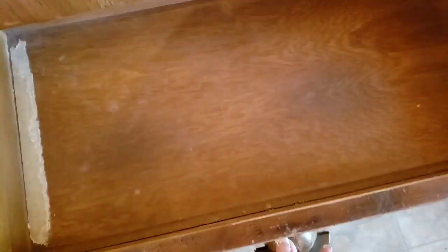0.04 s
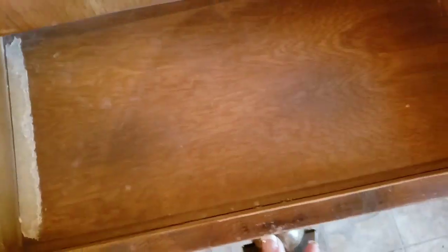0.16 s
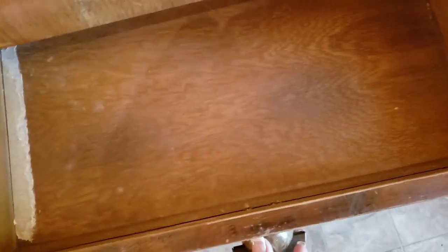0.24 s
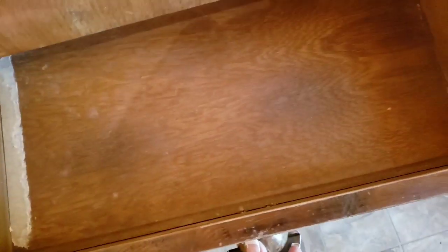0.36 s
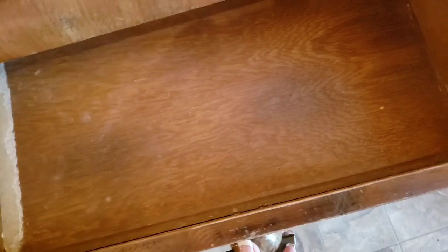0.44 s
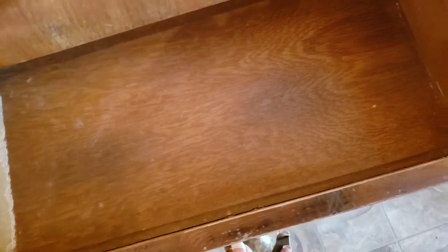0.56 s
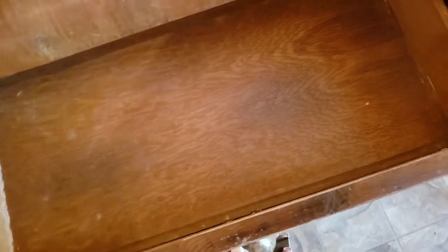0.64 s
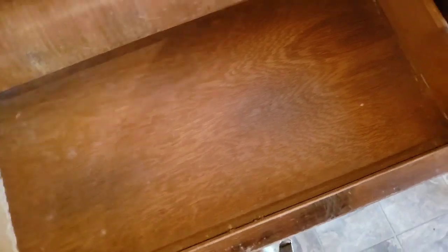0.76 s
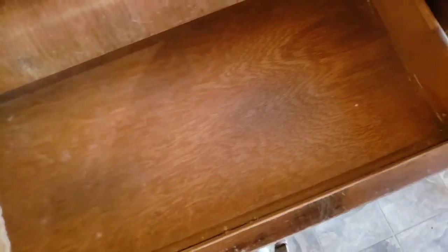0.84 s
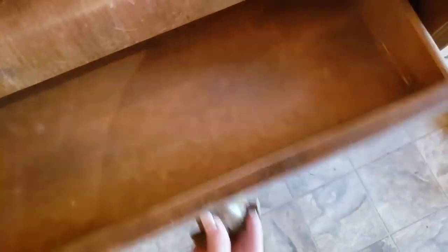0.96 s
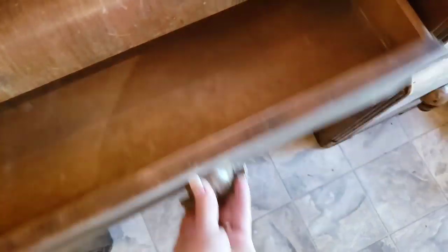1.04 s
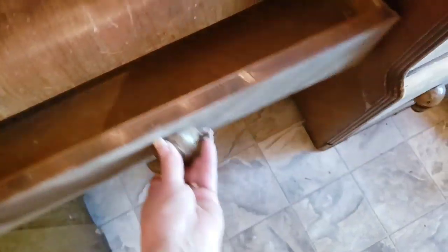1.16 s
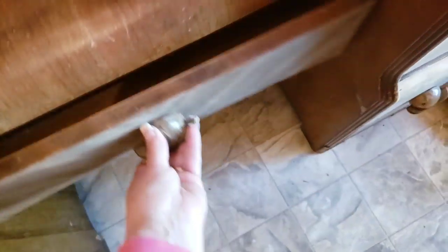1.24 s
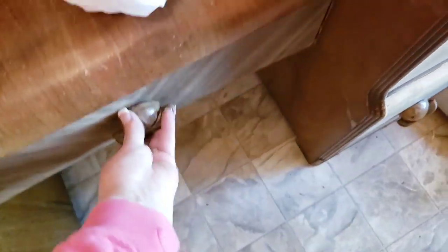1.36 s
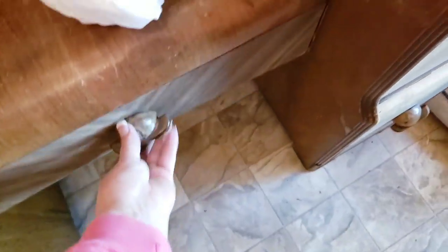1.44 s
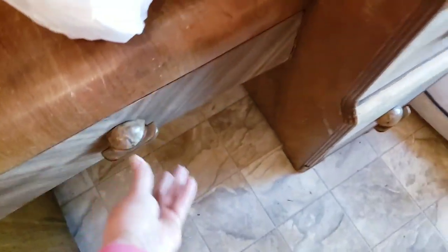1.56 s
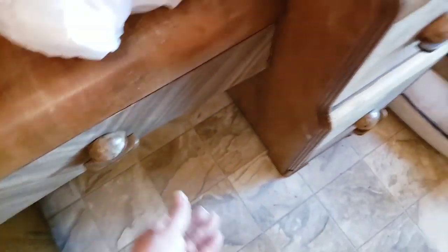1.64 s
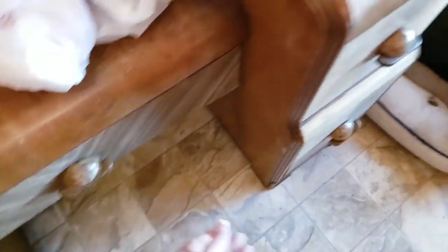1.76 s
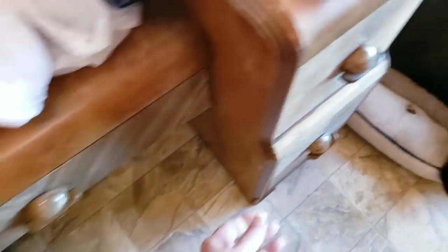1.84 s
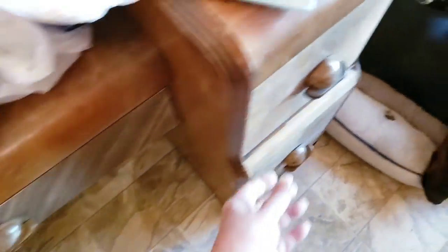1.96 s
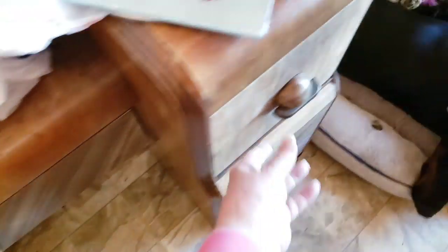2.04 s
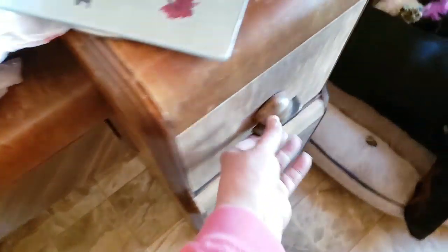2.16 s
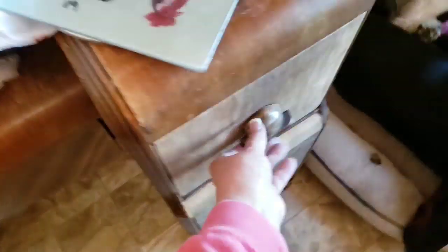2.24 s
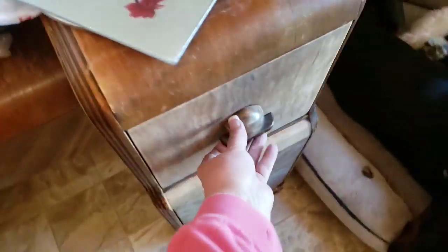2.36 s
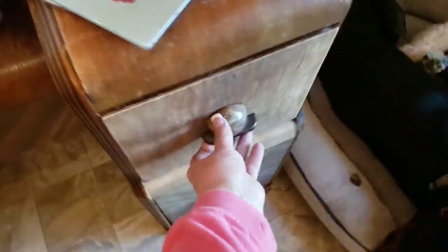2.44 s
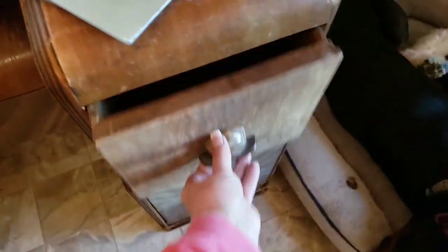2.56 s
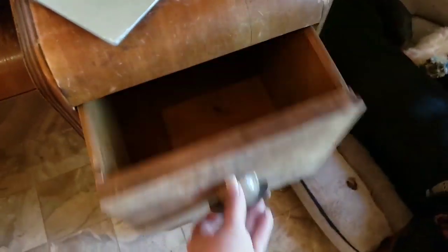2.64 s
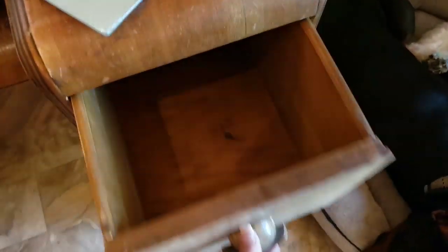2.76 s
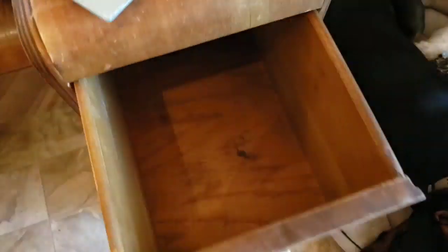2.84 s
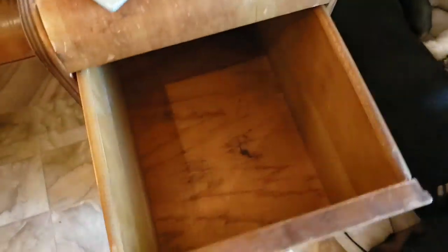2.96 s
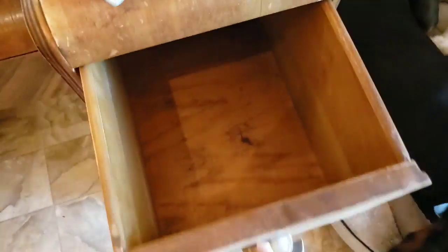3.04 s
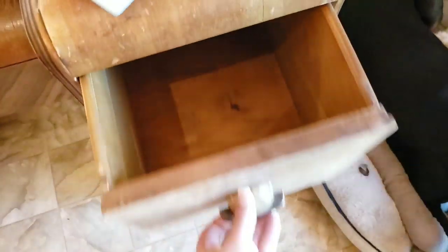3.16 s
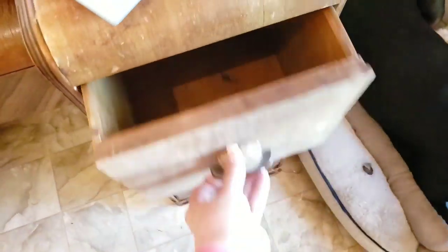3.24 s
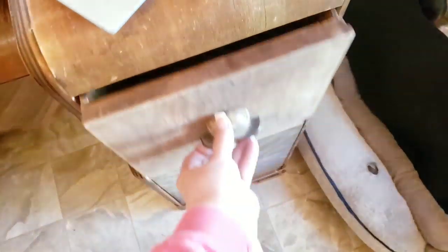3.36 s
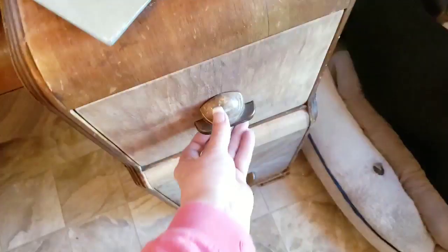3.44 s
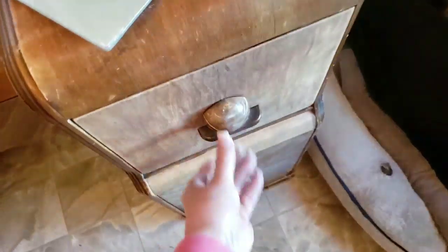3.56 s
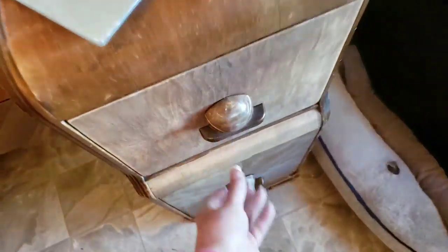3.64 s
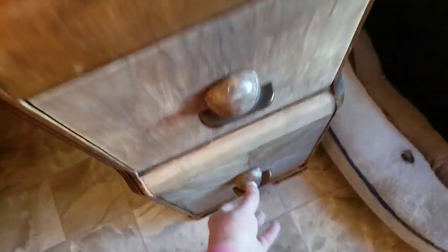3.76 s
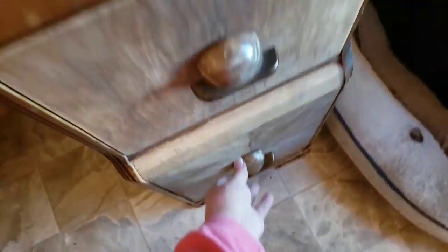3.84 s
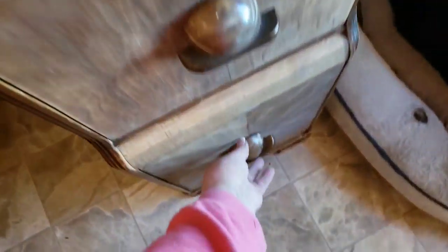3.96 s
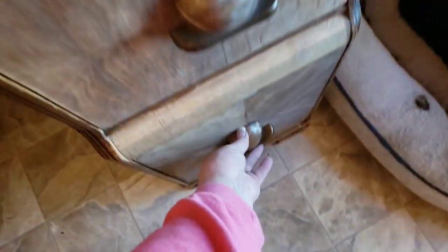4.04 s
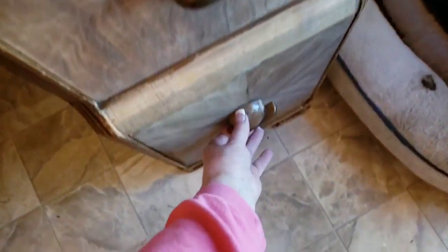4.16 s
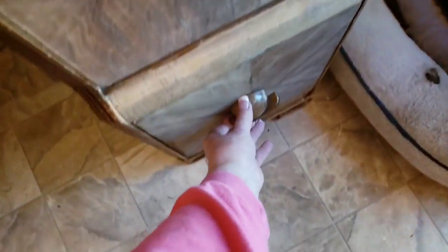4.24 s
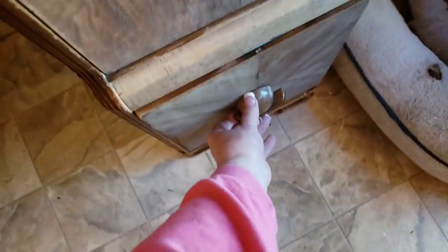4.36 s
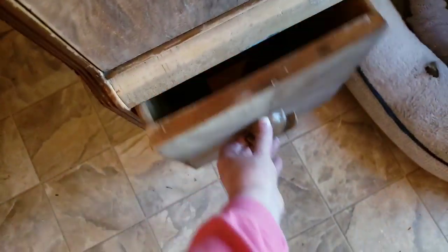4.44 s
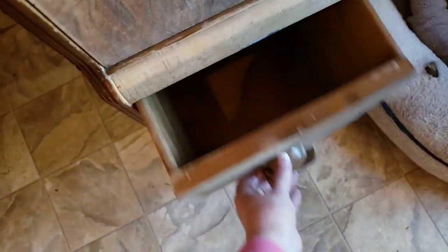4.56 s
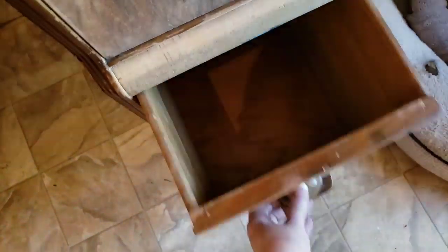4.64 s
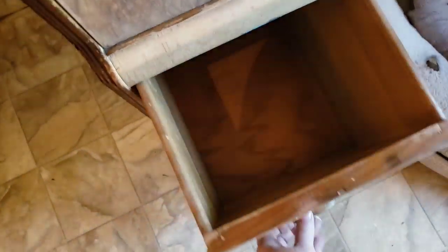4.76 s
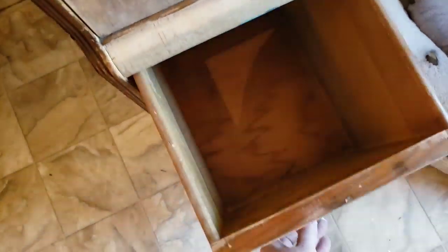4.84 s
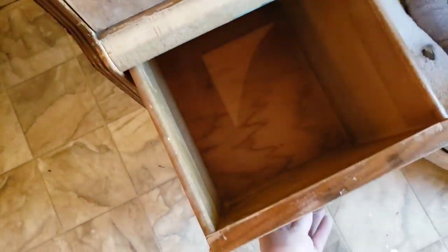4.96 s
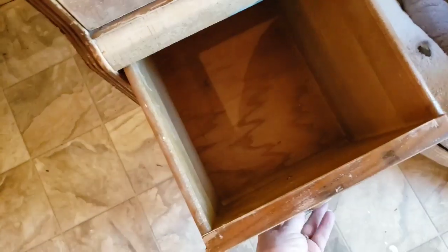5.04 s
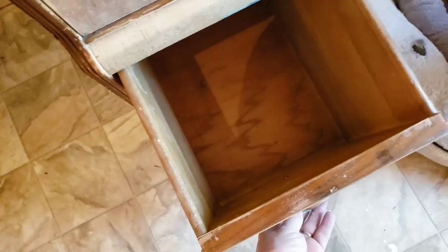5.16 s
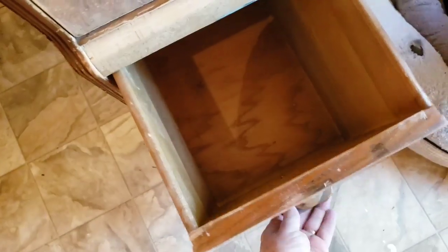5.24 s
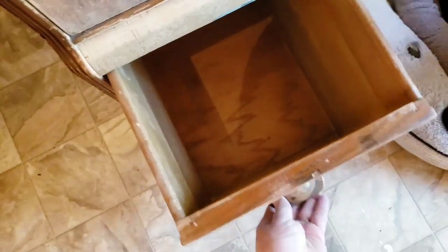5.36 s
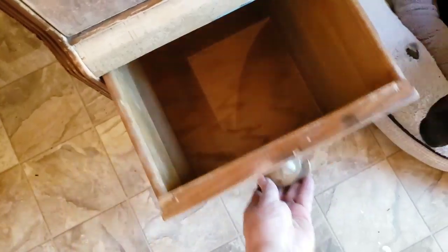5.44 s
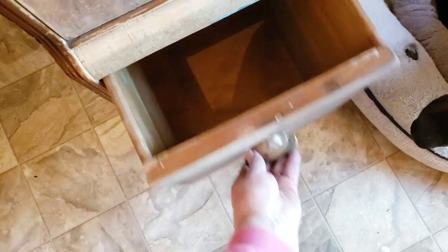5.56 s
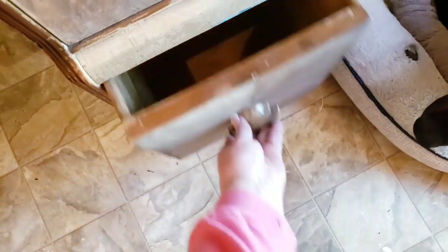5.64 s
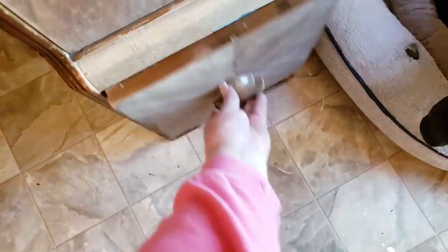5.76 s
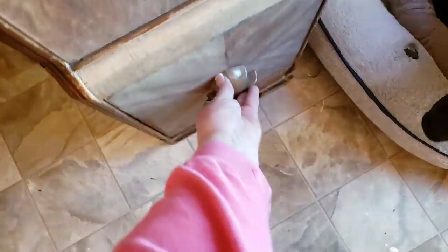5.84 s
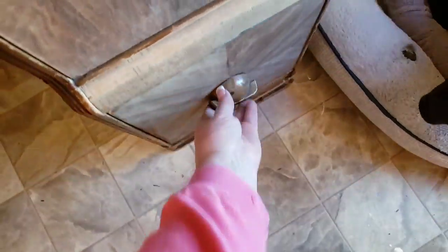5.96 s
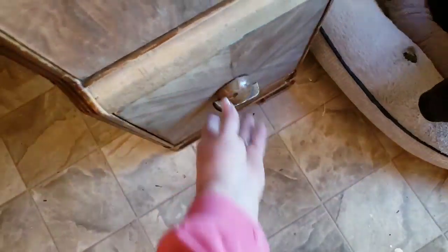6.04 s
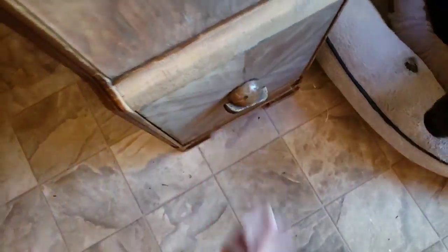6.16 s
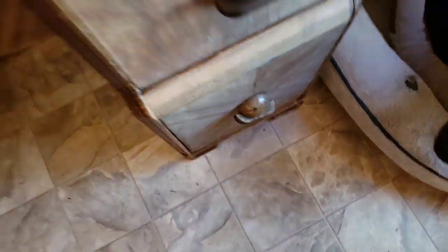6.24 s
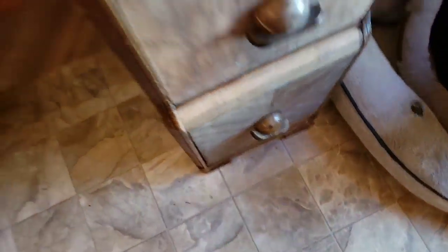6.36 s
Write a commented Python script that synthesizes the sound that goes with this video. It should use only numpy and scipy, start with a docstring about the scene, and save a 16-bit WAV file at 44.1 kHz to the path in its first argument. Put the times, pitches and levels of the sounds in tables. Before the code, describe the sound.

Close to the microphone in a small room, three drawers of an old wooden dresser are worked one after another. The first bumps open and, after a brief dropout, rumbles shut. The second slides out and back with a dry rasp and a softer knock. The third opens with a sharp slap of its metal pull, then shudders closed with a thud. Light handle clicks and faint sleeve rustle fill the gaps.

```python
"""A wooden drawer judders along its runners and knocks against its stop, close by, in a small room.
Three drawers of an old dresser are pulled out and pushed home in turn. Each stroke speeds up and slows
down; wood sticks and slips on wood, so it judders, rasps and shudders. The boxes knock as they tip and
hit their stops, the metal pulls click under the fingers, and a sleeve rustles as the arm moves on.
Just after the first knocks the sound cuts out for a moment."""
import sys
import numpy as np
from scipy import signal
from scipy.fft import rfft, irfft, next_fast_len
from scipy.io import wavfile
from scipy.ndimage import uniform_filter1d, map_coordinates

SR = 44100
rng = np.random.default_rng(int(sys.argv[2]) if len(sys.argv) > 2 else 0)


def wav_out(sig):
    """Save sig, one row per channel (or a flat mono array), as 16-bit PCM at SR to the path in sys.argv[1]."""
    wavfile.write(sys.argv[1], SR, np.round(np.clip(np.atleast_2d(sig).T, -1, 1) * 32767).astype(np.int16))


N = 282636
TIME = np.arange(N) / SR
RING_TIME = np.arange(SR // 2) / SR

# colour of the still air, the shuffling body and the sleeve (f/Hz, level/dB)
AIR_COLOUR = [(15, -26), (25, 8.5), (1520, -19), (2110, -3.5), (16000, -25)]
SHUFFLE_COLOUR = [(20, -12), (65, 8), (220, -6.5), (700, -33)]
SLEEVE_COLOUR = [(200, 2.5), (700, -1.5), (1400, -5), (2500, -5), (4500, -9), (7500, -19), (14000, -19)]
# decay of the room (f/Hz, t60/s)
ROOM_DECAY = [(80, 0.3349), (1500, 0.31), (15000, 0.36)]
# likeness of left and right (f/Hz, correlation)
STEREO_LIKENESS = [(130, 0.92), (600, 0.8), (1100, 0.083), (2500, 0.11)]
# stereo balance (f/Hz, left minus right/dB)
BALANCE = [(70, 1.5), (600, -2.5), (1100, -3), (2200, -10), (5000, -8.5), (10000, -2)]
# the arm moves on (t/s, rise/s, fall/s, shuffle/dB, sleeve/dB)
ARM_MOVES = [(0.529, 0.066, .12, -63, -55.5), (0.74, 0.079, 0.51, -61, -62.5),
             (1.75, 0.13, 0.091, -69.5, -67.5), (2.158, 0.0057, 0.33, -59, -65),
             (3.76, 0.4, 0.11, -52.5, -54), (6.189, 0.099, 0.092, -57, -54)]

# low modes of each drawer's box (f/Hz, level/dB, t60/s)
WIDE_MODES = [(85.4, -2.5, 0.35), (117.6, 1.5, 0.1), (161, 2, 0.14), (208, -2, 0.21), (274.3, -4.5, 0.14),
              (377.5, -7.5, 0.18), (477, -14, 0.18)]
UPPER_MODES = [(64.4, -12, 0.26), (97.4, -2.5, 0.11), (122.6, -3.5, 0.096), (170.5, -4, 0.15),
               (256, -9.5, 0.1), (311.5, -10, 0.095), (433, -19.5, .12)]
LOWER_MODES = [(47.2, -8, 0.18), (65.3, 7.5, 0.097), (85, 5, 0.14), (110.1, 0.5, 0.14), (165, 2.5, 0.053),
               (234.3, 1, 0.13), (290.7, 1, 0.083), (463, -16.5, 0.093)]
# colour of the rubbed panels (f/Hz, level/dB)
WIDE_COLOUR = [(200, 0.5), (450, -4.5), (650, -6), (1000, -12), (2500, -18), (3300, -24), (5000, -24.5),
               (8000, -35.5), (14000, -34.5)]
UPPER_COLOUR = [(200, -6), (450, 1.5), (800, -2), (1400, -6.5), (2200, -5), (3500, -13.5), (4800, -13),
                (9000, -28.5), (14000, -28.5)]
LOWER_COLOUR = [(200, -2.5), (450, -4.5), (800, -6.5), (1400, -10.5), (2200, -10), (3500, -18), (4800, -16),
                (9000, -32), (14000, -30)]
# panel resonances that stand out (f/Hz, width/Hz, boost/dB)
WIDE_PANELS = [(602, 26, 2.5), (774, 53, 1), (999, 35, 4), (1795, 55, 2), (2500, 160, 3)]
UPPER_PANELS = [(780, 95, 4.4), (1877, 52, 1.1)]
LOWER_PANELS = [(492.6, 31, 2), (807, 48, 0.9), (1296, 80, 3.1), (1640, 40, 3.3)]
DRAWERS = [(WIDE_MODES, WIDE_COLOUR, WIDE_PANELS), (UPPER_MODES, UPPER_COLOUR, UPPER_PANELS),
           (LOWER_MODES, LOWER_COLOUR, LOWER_PANELS)]
# the hand takes the next drawer (t/s)
HANDOVERS = [2.2, 4.3]

# a metal pull takes up its play or drops back (t/s, ring/dB, ring/Hz, tick/dB)
PULL_CLICKS = [(2.349, -63, 1530, -49.5), (2.449, -39.5, 1460, -49), (3.718, -39.5, 2090, -52),
               (3.734, -38, 2200, -39.5), (4.022, -38.5, 1200, -42), (4.033, -48, 1790, -40),
               (4.069, -45.5, 1900, -64), (4.157, -36, 1300, -43.5), (4.242, -46.5, 1370, -46.5),
               (4.523, -34, 1750, -55), (5.08, -45, 2000, -40.5), (5.183, -47.5, 1524, -49.5),
               (5.293, -45, 1080, -65), (5.473, -50, 690, -41.5), (6.151, -40.5, 660, -63)]
# modes of a pull on its drawer front (f/Hz, level/dB)
PULL_MODES = [(641, 10.5), (830, -4), (1135, 1), (1320, -0.5), (1491, 3.5), (1730, 0), (1900, -2.5),
              (2153, 3.5), (2320, -3)]
# overtones of the pull's plate (f/Hz, level/dB, t60/s)
PLATE_MODES = [(5570, 7, 0.042), (12050, -2.5, .06)]
# the lower drawer's pull slaps, then its box catches (t/s, clatter/dB, tick/dB)
LOWER_SNAPS = [(4.494, -22, -22), (5.103, -28.5, -44.5)]
# modes of that slap and that catch (f/Hz, level/dB)
SLAP_MODES = [(648, 8), (830, 3), (1550, 3), (2230, 3), (2780, 0.5), (3500, -9), (10100, -8.5)]
CATCH_MODES = [(552, 4.5), (684, 2.5), (1206, -2), (1600, -9), (2186, -4), (3381, -5), (3900, -8),
               (4791, -11)]
# colour of a hard tick, the panels' clack and the contact's crack (f/Hz, level/dB)
TICK_COLOUR = [(300, -13), (850, -13), (1400, 2), (3000, 3), (5300, 3), (6500, -3), (8800, -4.5),
               (10100, -5.5), (12000, -3), (16000, -8)]
CLACK_COLOUR = [(250, -11), (420, 9), (900, 1), (1500, -6), (2500, -8.5), (3200, -26), (6000, -35.5),
                (16000, -49)]
CRACK_COLOUR = [(1200, -27), (3200, 2), (5000, 1), (8000, -9.5), (13000, -12), (16000, -17)]

# one pull or push (t/s, speeding up/s, slowing down/s, sag at the ends/dB, judder/dB, scrape/dB, hiss/dB)
DRAWER_STROKES = [(0.0, 0.022, 0.097, 0.5, -26.5, -40, -53), (1.038, 0.15, 0.13, 7.5, -31, -43.5, -53.5),
                  (1.38, 0.088, 0.055, -3.5, -34.5, -38, -51.5), (2.599, 0.26, 0.19, 11, -32.5, -49, -46),
                  (3.118, 0.13, 0.36, 14.5, -31, -47, -46), (4.38, 0.44, 0.22, 15, -41, -40, -47),
                  (5.416, 0.013, 0.16, 1.5, -31, -49, -51.5), (5.618, 0.11, 0.25, 4, -37, -40, -47)]
# a runner binds (t/s, length/s, level/dB, centre/Hz)
TIGHT_SPOTS = [(0.527, .08, -58.5, 3150), (1.172, .08, -45, 3220), (2.876, 0.067, -35.5, 1860),
               (2.968, .04, -46, 3990), (4.535, 0.03, -40, 558), (4.728, 0.064, -36, 1394),
               (4.834, 0.036, -40, 2910), (5.022, 0.023, -46.5, 1202), (5.349, 0.09, -41, 1327),
               (5.717, 0.055, -31, 970), (5.941, 0.036, -34.5, 1500)]
# the slips lock onto a mode of the box (t/s, length/s, level/dB, f/Hz)
BOX_SHUDDERS = [(1.055, .05, -27.5, 170), (1.215, 0.072, -23.5, 162.3), (2.765, 0.075, -22.5, 170.7),
                (3.108, 0.068, -26.5, 290), (3.263, 0.062, -30.5, 290), (3.305, 0.054, -21, 165),
                (3.415, 0.048, -21.5, 160), (4.641, 0.054, -34, 118), (5.508, 0.036, -25, 250),
                (5.622, 0.06, -19.5, 107.2), (5.756, 0.048, -33.5, 250)]
# the box tips or catches on its way (t/s, thud/dB, thud/Hz, clack/dB, crack/dB)
BOX_BUMPS = [(0.137, -8, 161, -23, -41), (0.229, -17, 283, -32, -47), (0.439, -40, 165, -55.5, -65),
             (0.757, -38, 136, -64, -71), (0.812, -27, 137, -47.5, -71.5), (1.371, -18.5, 347, -24, -52),
             (1.409, -25, 250, -37.5, -61.5), (2.576, -26.5, 159, -38, -53),
             (3.114, -23.5, 179, -31.5, -55), (3.392, -19, 142, -42, -61), (3.672, -29.5, 200, -41.5, -60),
             (4.351, -45, 200, -51.5, -67.5), (4.671, -27.5, 300, -38.5, -53.5),
             (4.824, -22, 280, -34, -49.5), (4.963, -16, 200, -32.5, -43), (5.103, -33, 246, -37, -51),
             (5.425, -17.5, 194, -32.5, -46.5), (5.622, -22, 163, -23, -34.5)]
# the box hits its stop, then its weight swings the dresser
# (t/s, thud/dB, clack/dB, crack/dB, swing lag/s, swing/dB, swing/Hz)
END_STOPS = [(0.168, -9, -17.5, -42, .022, -8.5, 169.5), (1.498, -16, -14, -31.5, .018, -12.5, 190),
             (3.612, -28.5, -31.5, -48, .028, -17, 214), (5.968, -14.5, -20, -32.5, .007, -12, 61.6)]


def amp(db):
    """Decibels to gain."""
    return 10 ** (np.asarray(db) / 20)


def unit(x):
    """Scale to rms 1."""
    return x / np.sqrt(np.mean(x ** 2) + 1e-20)


def unit_burst(x):
    """Scale a burst so that its loudest few milliseconds have rms 1."""
    power = uniform_filter1d(np.atleast_2d(x ** 2).mean(0), size=256)
    return x / np.sqrt(power.max() + 1e-20)


def along(points, hz):
    """Read a curve of (f/Hz, value) points on a log frequency axis."""
    knots_hz, values = np.transpose(points)
    return np.interp(np.log(hz + 1), np.log(knots_hz + 1), values)


def peak_boost(peaks, hz):
    """The dB that resonances add to a colour."""
    return sum(db / (1 + (2 * (hz - centre) / width) ** 2) for centre, width, db in peaks)


def cluster(modes, hz, q=24):
    """Colour in dB of tight clusters of modes."""
    power = sum(amp(db) ** 2 / (1 + (q * (hz / centre - centre / (hz + 1))) ** 2)
                for centre, db in modes)
    return 10 * np.log10(power)


def rolloff(ratio, order):
    """Filter slope in dB: flat while the frequency ratio is below 1, falling above it."""
    return -10 * np.log10(1 + ratio ** (2 * order))


def coloured(x, level_db):
    """Minimum-phase EQ whose gain in dB is a function of frequency."""
    n = x.shape[-1]
    m = 2 * next_fast_len(n // 2 + 2048)
    gain = np.maximum(amp(level_db(np.fft.rfftfreq(m, 1 / SR))), 1e-6)
    cepstrum = irfft(np.log(gain), m)
    cepstrum[..., 1:m // 2] *= 2  # folded forward, so nothing rings ahead of an attack
    cepstrum[..., m // 2 + 1:] = 0
    return irfft(rfft(x, m) * np.exp(rfft(cepstrum)), m)[..., :n]


def noise(size):
    """White stereo noise, narrow in the bass and wide in the treble."""
    m = next_fast_len(size)
    likeness = along(STEREO_LIKENESS, np.fft.rfftfreq(m, 1 / SR))
    angle = np.arccos(np.clip(likeness, -1, 1)) / 2
    spectra = rfft(rng.standard_normal((2, size)), m)
    mid, side = irfft(spectra * [np.cos(angle), np.sin(angle)], m)[:, :size]
    return np.array([mid + side, mid - side])


def wobble(rate, size):
    """A smooth random curve with rate knots a second."""
    knots = rng.standard_normal(int(size * rate / SR) + 4)
    return map_coordinates(knots, [np.arange(size) * rate / SR])


def swell(start, rise, fall, sag_db, edge_s):
    """Envelope of a gesture: 1 at full speed, sag_db lower at both ends, fading quickly beyond them."""
    t = TIME - start - rise
    way = np.clip(np.where(t < 0, t / rise, t / fall), -1, 1)
    outside = np.maximum(-t - rise, 0) + np.maximum(t - fall, 0)
    return amp(-sag_db * way ** 2) * np.exp(-outside / edge_s)


def add(track, s, sound):
    """Mix a sound into the track at s seconds."""
    start = max(round(s * SR), 0)
    track[:, start:start + sound.shape[-1]] += sound[..., :N - start]


def ring(modes, scatter_db, centre_hz=200, focus_db=0):
    """Damped modes at new strengths; a blow favours those near centre_hz (focus_db per octave squared)."""
    hz, db, t60 = np.transpose(modes)[:, :, None]
    level = db + scatter_db * rng.standard_normal(hz.shape) - focus_db * np.log2(hz / centre_hz) ** 2
    sign = (-1) ** np.arange(len(hz))[:, None]
    return np.sum(sign * amp(level - 60 * RING_TIME / t60) * np.sin(2 * np.pi * hz * RING_TIME), 0)


def burst(level_db, t60, tail_db, tail_t60):
    """Dense modes of a struck part: a fast decay and a weaker, longer tail."""
    decay = amp(-60 * RING_TIME / t60) + amp(tail_db - 60 * RING_TIME / tail_t60)
    return unit_burst(coloured(noise(len(RING_TIME)) * decay, level_db))


def slips(rate, spread_db=3):
    """Random slips of a rubbed surface, rate a second, uneven in size."""
    return (rng.random(N) < rate / SR) * amp(spread_db * np.clip(rng.standard_normal(N), -2, 2))


def patchy(x, depth_db):
    """As the contact travels, ever different resonances speak up."""
    spectra = signal.stft(x, nperseg=1024)[2]
    patches = uniform_filter1d(rng.standard_normal(spectra.shape[1:]), size=4, axis=0)
    patches = uniform_filter1d(patches, size=5, axis=1)
    return signal.istft(spectra * amp(depth_db * unit(patches)), nperseg=1024)[1][:, :N]


def rasp(level_db, rate):
    """Friction texture: each slip sets off a short grain, over a bed of even rubbing."""
    grains = unit(signal.fftconvolve(slips(rate), np.exp(-RING_TIME / .002))[:N])
    rubbing = patchy(noise(N) * (grains + .5), depth_db=3.5)
    return unit(coloured(rubbing, level_db))


def still_air():
    """Room tone: a steady bed of noise."""
    return unit(coloured(noise(N), lambda hz: along(AIR_COLOUR, hz)))


def room(x):
    """The small room answers, each frequency dying at its own speed."""
    hz, t, spectra = signal.stft(noise(len(RING_TIME)), SR, nperseg=256)
    decay = amp(-60 * t / along(ROOM_DECAY, hz)[:, None])
    tail = signal.istft(spectra * decay, SR, nperseg=256)[1]
    tail *= 1 - np.exp(-np.arange(tail.shape[1]) / SR / 0.0011)
    return signal.fftconvolve(x, tail / np.linalg.norm(tail[0]), axes=1)[:, :N]


def sleeve_and_shuffle():
    """Cloth rustles and the body shuffles as the arm moves on."""
    shuffle, sleeve = sum(np.outer(amp(levels_db), swell(start, rise, fall, sag_db=6.5, edge_s=.025))
                          for start, rise, fall, *levels_db in ARM_MOVES)
    rumble = unit(coloured(noise(N), lambda hz: along(SHUFFLE_COLOUR, hz)))
    cloth = rasp(lambda hz: along(SLEEVE_COLOUR, hz), rate=2200)
    return shuffle * rumble + sleeve * cloth


def pull_clicks():
    """The pull ticks against its plate, rattles and rings briefly in the modes near its ring pitch."""
    out = np.zeros((2, N))
    clink_t60 = 0.048
    modes = [(hz, db, clink_t60) for hz, db in PULL_MODES]
    for s, ring_db, ring_hz, tick_db in PULL_CLICKS:
        clink = unit_burst(ring(modes, scatter_db=3, centre_hz=ring_hz, focus_db=17.5))
        struck = lambda hz: cluster(PULL_MODES, hz) - np.minimum(12 * np.log2((hz + 1) / ring_hz) ** 2, 20)
        rattle = burst(struck, t60=0.028, tail_db=-22, tail_t60=0.15)
        metal = unit_burst(clink + amp(-3.5) * rattle)
        tick = burst(lambda hz: along(TICK_COLOUR, hz), t60=0.014, tail_db=-20.5, tail_t60=0.14)
        plate_db = -13 + 27.5 * np.log2(ring_hz / 2200)  # a dull click hardly wakes the plate
        plate = amp(plate_db) * unit_burst(ring(PLATE_MODES, scatter_db=1.5))
        add(out, s, amp(ring_db) * (metal + plate) + amp(tick_db) * tick)
    return out


def snaps():
    """Two hard, dry hits: the lower drawer's tugged pull slaps, and its box catches at the runners' end."""
    out = np.zeros((2, N))
    for (s, clatter_db, tick_db), modes in zip(LOWER_SNAPS, (SLAP_MODES, CATCH_MODES)):
        clatter = burst(lambda hz: cluster(modes, hz), t60=.035, tail_db=-18, tail_t60=.16)
        tick = burst(lambda hz: along(TICK_COLOUR, hz), t60=0.014, tail_db=-15.5, tail_t60=0.2)
        add(out, s, amp(clatter_db) * clatter + amp(tick_db) * tick)
    return out


def drawer_at(s):
    """Which drawer is in the hand at s seconds."""
    return np.searchsorted(HANDOVERS, s)


def box_ring(box, scatter_db, centre_hz=200, focus_db=0):
    """The low ring of an open box, which radiates little below its lowest mode."""
    cutoff_hz = .8 * box[0][0]
    ringing = ring(box, scatter_db, centre_hz, focus_db)
    return coloured(ringing, lambda hz: rolloff(cutoff_hz / (hz + 1), order=2))


def panel_ring(peaks):
    """The hollow note of the thin panels: the narrower a resonance, the longer it rings."""
    modes = [(hz, db, np.log(1000) / np.pi / width) for hz, width, db in peaks]
    return unit_burst(ring(modes, scatter_db=4.5, centre_hz=620, focus_db=4.5))


def binds(skirt_db_per_octave=13.5):
    """Where a runner is tight, dense slips swell into a brief, pitched rasp."""
    out = np.zeros((2, N))
    for s, length, db, centre_hz in TIGHT_SPOTS:
        size = int(length * SR)
        slipping = noise(len(RING_TIME)) * amp(wobble(330, len(RING_TIME)))
        band = lambda hz: -skirt_db_per_octave * np.abs(np.log2((hz + 1) / centre_hz))
        grating = unit(coloured(slipping, band))[:, :size]
        add(out, s, amp(db) * grating * np.hanning(size))
    return out


def shudders(pitch_drift=0.075):
    """Regular stick-slip: a short, low groan whose every slip raps the panels."""
    out = np.zeros((2, N))
    for s, length, db, hz in BOX_SHUDDERS:
        _, _, peaks = DRAWERS[drawer_at(s)]
        size = int(length * SR)
        cycles = np.cumsum(hz * (1 + pitch_drift * wobble(35, len(RING_TIME))[:size])) / SR
        groan = unit(np.sin(2 * np.pi * cycles))
        jerks = np.diff(np.floor(cycles), prepend=0) * rng.random(size)  # one slip a cycle
        raps = unit(signal.fftconvolve(jerks, panel_ring(peaks))[:size])
        add(out, s, amp(db) * (groan + amp(-26) * raps) * np.hanning(size))
    return out


def travel(drawer, drag_db=0.25):
    """Gains of judder, scrape and hiss: they ride this drawer's strokes and its runners' uneven drag."""
    gains = sum(np.outer(amp(levels_db), swell(start, rise, fall, sag_db, edge_s=.018))
                for start, rise, fall, sag_db, *levels_db in DRAWER_STROKES
                if drawer_at(start) == drawer)
    return gains * amp(drag_db * wobble(23, N))


def slide(gains, box, wood, peaks, split_hz=1800):
    """Stick-slip on the runners shakes the box; coarse grain scrapes and fine grain hisses."""
    judder, scrape, hiss = gains
    jolts = slips(rate=170) * rng.choice([-1, 1], N)
    shake = signal.fftconvolve(jolts, box_ring(box, scatter_db=2))[:N]
    pitch_bend = 1 + .06 * wobble(12, N)  # the modes shift as the box rocks on its supports
    shake = map_coordinates(shake, [np.cumsum(pitch_bend)], mode="mirror")
    shake /= np.sqrt(np.abs(uniform_filter1d(shake ** 2, size=2000)) + 1e-9)  # the hand pushes evenly
    panel = lambda hz: along(wood, hz) + peak_boost(peaks, hz)
    coarse = rasp(lambda hz: panel(hz) + rolloff(hz / split_hz, order=3), rate=840)
    fine = rasp(lambda hz: panel(hz) + rolloff(split_hz / (hz + 1), order=3), rate=4400)
    pressure = unit(np.exp(.15 * np.clip(shake, -2, 2)))  # the shaking box presses and eases its runners
    return judder * shake + pressure * scrape * coarse + hiss * fine


def blows(first_thud_hz=200, rebound_db=-6):
    """Every hit, in the columns of BOX_BUMPS: one for a bump, contact and swing for a stop."""
    hits = list(BOX_BUMPS)
    for s, thud_db, clack_db, crack_db, lag, swing_db, swing_hz in END_STOPS:
        hits.append((s, thud_db, first_thud_hz, clack_db, crack_db))
        hits.append((s + lag, swing_db, swing_hz, clack_db + rebound_db, crack_db + rebound_db))
    return hits


def knocks():
    """A blow cracks at the contact, clacks in the panels and thuds through the whole box."""
    out = np.zeros((2, N))
    thud_attack = 1 - np.exp(-RING_TIME / 0.0011)
    clack_attack = 1 - np.exp(-RING_TIME / 0.00085)
    for s, thud_db, thud_hz, clack_db, crack_db in blows():
        box, _, peaks = DRAWERS[drawer_at(s)]
        thud = unit_burst(box_ring(box, scatter_db=2.7, centre_hz=thud_hz, focus_db=3) * thud_attack)
        panel = lambda hz: along(CLACK_COLOUR, hz) + peak_boost(peaks, hz)
        clack = burst(panel, t60=0.06, tail_db=-9, tail_t60=.25)
        clack = unit_burst((clack + amp(-4) * panel_ring(peaks)) * clack_attack)
        crack = burst(lambda hz: along(CRACK_COLOUR, hz), t60=0.068, tail_db=-22, tail_t60=0.46)
        add(out, s, amp(thud_db) * thud + amp(clack_db) * clack + amp(crack_db) * crack)
    return out


def scene():
    """The dresser and its room reverb, with the sleeve left dry, over still air."""
    sliding = sum(slide(travel(k), *drawer) for k, drawer in enumerate(DRAWERS))
    dresser = sliding + binds() + shudders() + knocks() + pull_clicks() + snaps()
    return amp(-71.5) * still_air() + dresser + amp(-7.5) * room(dresser) + sleeve_and_shuffle()


def record(dry):
    """The right microphone hears more treble; the sound cuts out briefly; nothing passes above top_hz."""
    mute_from_s, mute_to_s, top_hz = .298, .434, 16000
    muted = (TIME > mute_from_s) & (TIME < mute_to_s)
    gate = 1 - uniform_filter1d(muted.astype(float), size=64)
    m = next_fast_len(N + SR // 2)
    hz = np.fft.rfftfreq(m, 1 / SR)
    pan = amp(np.outer([.5, -.5], along(BALANCE, hz)))
    pan /= np.sqrt(np.mean(pan ** 2, 0))  # constant power
    return irfft(rfft(dry * gate, m) * pan * (hz < top_hz), m)[:, :N]


dry = scene()
out = record(dry)
wav_out(out)
```